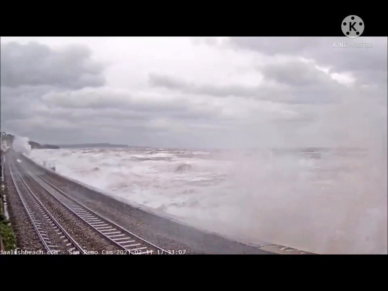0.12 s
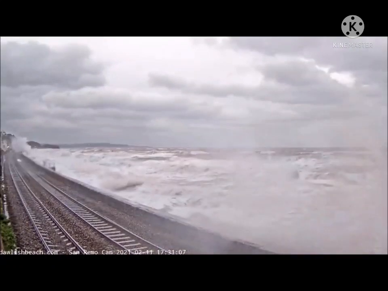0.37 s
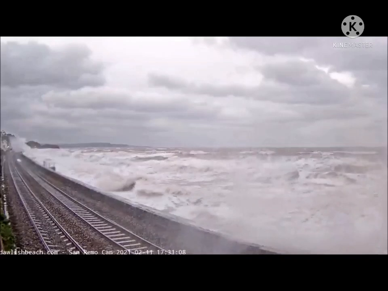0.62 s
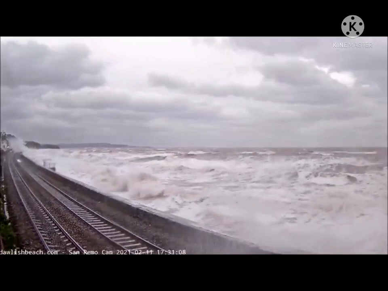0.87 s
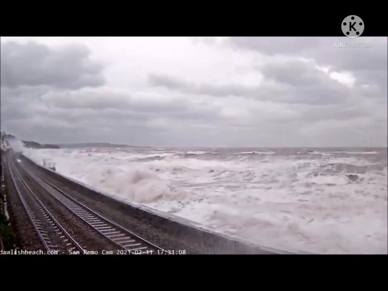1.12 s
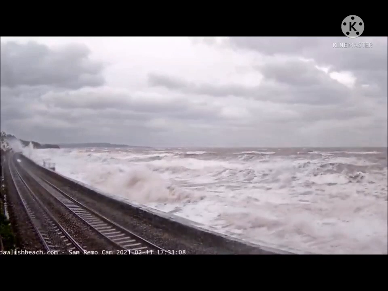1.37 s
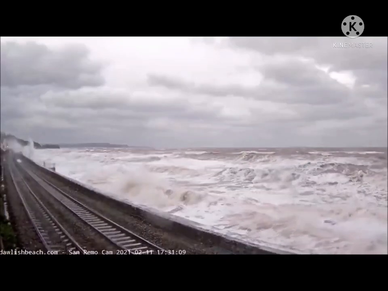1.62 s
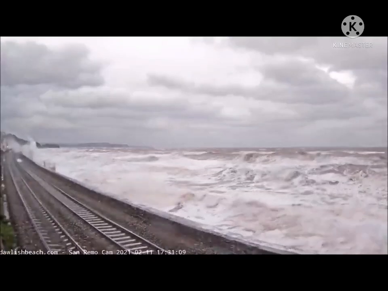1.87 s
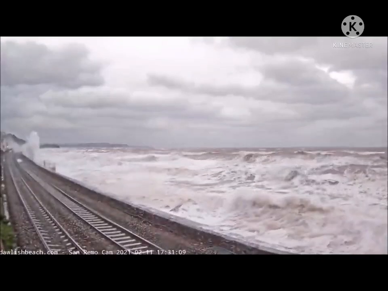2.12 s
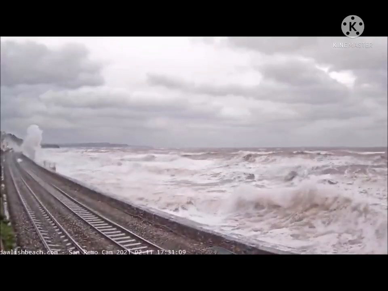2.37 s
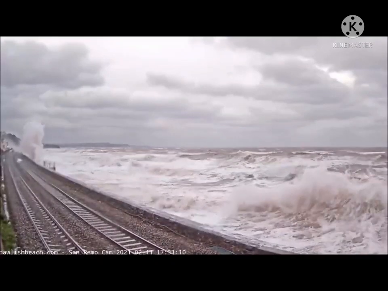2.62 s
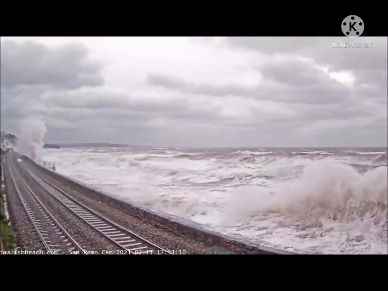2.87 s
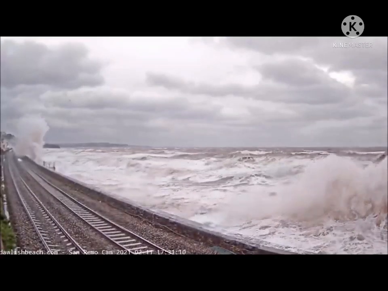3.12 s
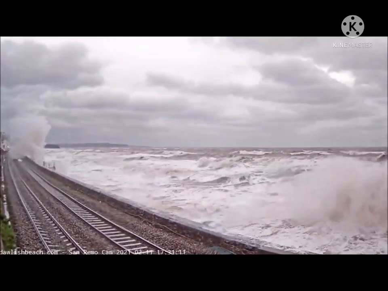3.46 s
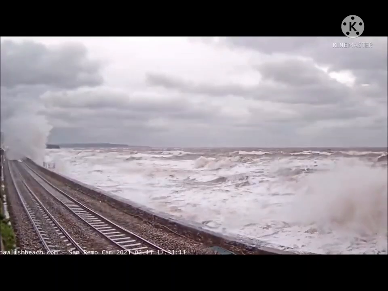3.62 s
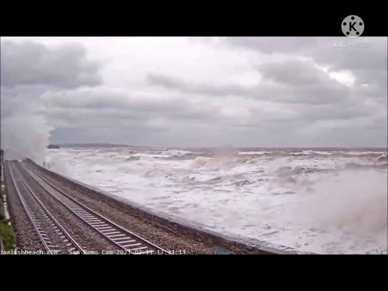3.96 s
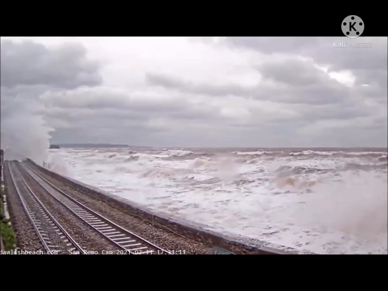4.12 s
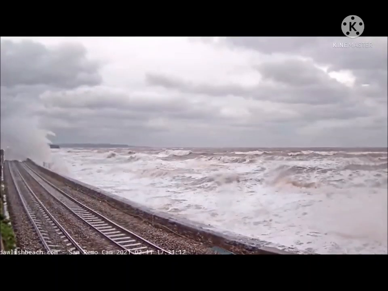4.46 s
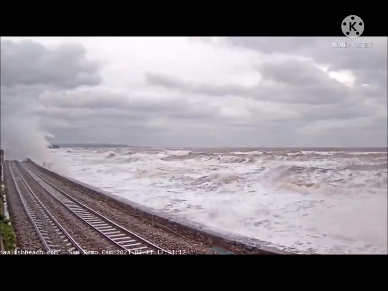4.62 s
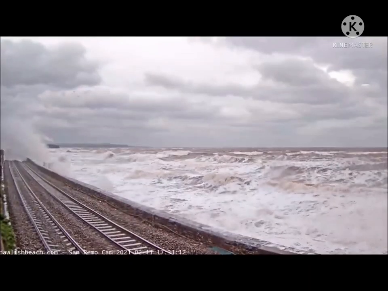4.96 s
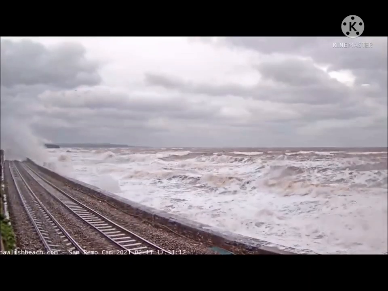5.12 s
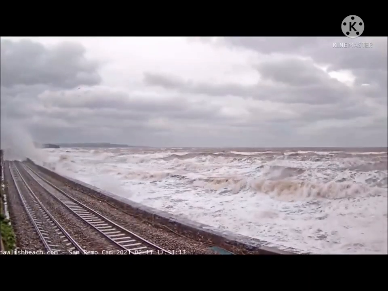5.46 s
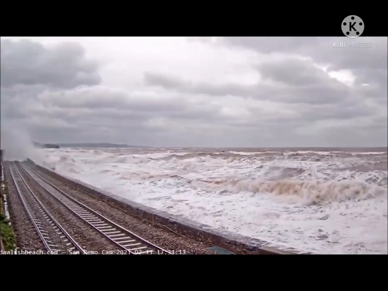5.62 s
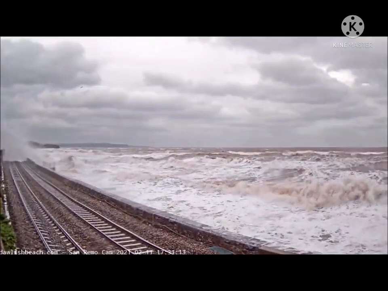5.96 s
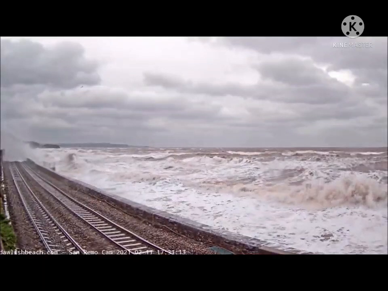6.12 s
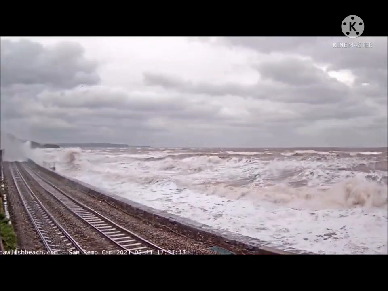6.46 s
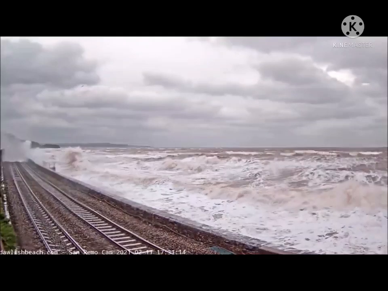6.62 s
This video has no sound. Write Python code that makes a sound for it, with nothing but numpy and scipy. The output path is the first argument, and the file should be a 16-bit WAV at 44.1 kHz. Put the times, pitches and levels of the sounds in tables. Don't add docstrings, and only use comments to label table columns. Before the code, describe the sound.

Rough surf bursts on a seaside wall with low roar, foamy wash and bright spray, under rumbling wind on a thin, glitchy mono microphone.

```python
import sys
import numpy as np
from scipy import signal
from scipy.fft import rfft, irfft, next_fast_len
from scipy.io import wavfile
from scipy.ndimage import uniform_filter1d

SR = 44100
rng = np.random.default_rng(int(sys.argv[2]) if len(sys.argv) > 2 else 0)


def persist_wave(psi):
    counts = np.round(np.clip(psi, -1, 1) * 32767).astype(np.int16)
    wavfile.write(sys.argv[1], SR, np.atleast_2d(counts).T)


def gain_from_decibels(decibels):
    exponent = np.asarray(decibels, float) / 20
    return 10 ** exponent


N = 299828

# frequency in Hz, level in dB per Hz.
HEAVE_SPECTRUM = [(.5, -12), (2, 0), (8, -1), (14, -4), (20, -30), (60, -140)]
# frequency in Hz, level in dB per Hz.
BUFFET_SPECTRUM = [(8.2, -37), (14, -7), (29, -1), (120, -20), (160, -53), (260, -120)]
# peak in seconds, level in dB.
PUSHES = [
    (.57, -28),
    (1.05, -35),
    (1.53, -29),
    (1.78, -34),
    (3.26, -38),
    (3.86, -37),
    (4.41, -29),
    (5.07, -25),
    (5.79, -37),
    (6.27, -37),
]
# peak in seconds, level in dB.
GUSTS = [(.15, -37.5), (.45, -35.5), (.58, -36.5), (1.06, -38), (1.17, -34), (1.3, -34.5), (1.4, -32),
         (1.9, -33.5), (2.2, -33), (2.421, -38), (3.0, -34.5), (3.351, -30), (3.7, -35.5), (3.961, -35.5),
         (4.11, -35.5), (4.55, -36), (4.8, -37), (5.04, -33.5), (5.259, -31.5), (5.5, -36), (5.75, -36.5),
         (6.0, -34.5), (6.28, -33), (6.49, -33)]
# frequency in Hz, level in dB per Hz.
ROAR_SPECTRUM = [(47, -20.5), (80, -4.5), (102, -6.5), (211, -5.5), (260, -5.5), (410, 0.5), (523, -7),
                 (815, -11.5), (938, -20.5), (1120, -23), (1260, -34.5), (1300, -37.5), (1690, -59.5),
                 (2860, -120)]
# frequency in Hz, level in dB per Hz.
FOAM_SPECTRUM = [(850, -38), (1450, -1), (2030, 0.5), (2330, 0.5), (2720, -8.5), (2950, -6.5), (3250, -4.5),
                 (4200, -1.5), (6290, -3), (9050, -15.5), (10500, -50.5), (14000, -54), (15200, -52)]
# frequency in Hz, level in dB per Hz.
SPRAY_SPECTRUM = [(1940, -58), (3300, -16.5), (3820, -9), (4460, -9.5), (5100, -0.5), (5540, -6),
                  (7160, 1.5), (7940, -7), (8850, -4), (10300, -10), (10500, -12.5), (12000, -18),
                  (14400, -27), (15200, -27)]
# peak in seconds, level in dB.
BOOMS = [
    (0.0, -35),
    (1.211, -38.5),
    (1.9, -39.5),
    (2.55, -41),
    (4.26, -37),
    (6.53, -33.5),
    (6.62, -36.5),
    (6.75, -36.5),
]
# crest in seconds, build-up in seconds, hold in seconds,
# foam level in dB, spray level in dB.
WAVES = [
    (-.2, .5, .3, -57, -59),
    (0.637, .75, 0.85, -52, -39),
    (0.977, 0.57, .25, -57, -42.5),
    (4.153, 1.3, 0.77, -53.5, -49),
    (6.593, .6, 0.11, -48, -47.5),
]
# centre in Hz, width in Hz, gain in dB.
HOUSING_RESPONSE = [(1258, 83, -5.5), (1407, 80, -8), (1518, 70, 3), (2720, 180, 2.5), (2902, 160, 6),
                    (3317, 150, -8.5), (5153, 400, 1), (5916, 180, -0.5), (6200, 80, -1.5),
                    (7030, 510, 0.5), (7800, 340, -1), (9540, 190, -3.5), (10310, 400, -6.5),
                    (12050, 200, -.5), (15200, 420, -10)]
# frame number, lines left above the roar, lowest line in Hz.
STARVED_FIRST = [(12, 9, 1535), (16, 3, 6973), (26, 8, 5145), (47, 11, 5379), (49, 12, 4676),
                 (54, 11, 3926), (55, 4, 4957), (77, 8, 1559), (78, 16, 1723), (87, 0, 0), (95, 11, 1559),
                 (99, 4, 2355), (148, 3, 1723), (180, 8, 1535), (193, 7, 3059), (200, 11, 4043),
                 (201, 18, 1559), (214, 9, 3574), (224, 5, 4676), (228, 10, 2238), (233, 4, 1113),
                 (236, 4, 1090), (255, 5, 1770), (271, 4, 2191), (273, 10, 1066), (291, 7, 2941),
                 (296, 9, 2098), (299, 8, 1934), (301, 5, 2191)]
# frame number, lines left above the roar, lowest line in Hz.
STARVED_SECOND = [(0, 7, 1090), (32, 18, 4066), (81, 8, 1840), (94, 6, 1770), (159, 8, 1863),
                  (184, 4, 3105), (187, 5, 1559), (198, 8, 2566), (217, 3, 4676), (225, 12, 1066),
                  (297, 7, 1113), (298, 5, 1559), (304, 6, 1535), (313, 6, 1512)]
# frequency in Hz, step in dB re line height.
STARVED_STEP = [(1000, 1.5), (5000, 0.5), (7200, 1), (9000, -4), (9600, -5.5), (10000, 4)]
# frequency in Hz, level in dB re its share.
LEAK = [(1000, -8), (4000, -7), (6000, -1), (10000, 4)]
# frequency in Hz, step in dB.
GRAIN = [(5000, 0), (8000, 2), (12000, 4)]
# frequency in Hz, step in dB.
FINEST_STEP = [(9000, -82), (12000, -72), (13500, -69), (14900, -68), (15100, -58), (15500, -54)]
# frequency in Hz, level in dB per Hz.
WIDE_SPECTRUM = [(4500, -60), (4620, -5), (5700, -5), (5800, -60), (6800, -60), (6900, 0), (7600, -1),
                 (8250, -9), (8350, -60)]

FOAM_REST_DB, SPRAY_REST_DB, ROAR_REST_DB = -57, -61, -36.5
WAVE_BUILD_DB = 13.5
LINK_SR, FRAME, ROAR_LINES = 48000, 1024, 44


def at_hz(points, hz):
    log_hz = np.log(np.array(points)[:, 0])
    return np.interp(np.log(hz + 0.0012), log_hz, np.array(points)[:, 1])


def shaped(x, db_at):
    size = next_fast_len(N)
    gain = gain_from_decibels(db_at(np.fft.rfftfreq(size, 1 / SR)))
    return irfft(rfft(x, size) * gain, size)[:N]


def noise(spectrum):
    x = shaped(rng.standard_normal(N), lambda hz: at_hz(spectrum, hz))
    return x / x.std()


def drift(rate_hz):
    return noise([(rate_hz, 0), (rate_hz * 30, -60)])


def evened(spectrum, over_s):
    eddies, span = noise(spectrum), int(over_s * SR)
    swell = uniform_filter1d(uniform_filter1d(eddies ** 2, span), span)
    return eddies / np.sqrt(swell + .15)


def swells(rest_db, s, db, rise_db_per_s, hold_s, fall_db_per_s):
    hop = 64
    t = np.arange(0, N + hop, hop)[:, None] / SR - s
    climb_db = rise_db_per_s * np.maximum(-t, 0)
    fall_db = fall_db_per_s * np.maximum(t - hold_s, 0)
    power = gain_from_decibels(2 * (db - climb_db - fall_db)).sum(axis=1)
    power = np.interp(np.arange(N) / hop, np.arange(len(t)), power)
    return 10 * np.log10(gain_from_decibels(2 * rest_db) + power)


def slam():
    start_s, peak_db, hz, t60_s, crest_t60_s = 1.916, -15, 21.5, 0.8, .35
    t = np.maximum(np.arange(N) / SR - start_s, 0)
    swing = -np.sin(2 * np.pi * hz * t) * gain_from_decibels(-60 * t / t60_s)
    overtones = np.sin(6 * np.pi * hz * t) - np.cos(4 * np.pi * hz * t)
    crest = overtones * gain_from_decibels(-60 * t / crest_t60_s)
    onset = 1 - np.exp(-t / .02)
    return gain_from_decibels(peak_db) * onset * (swing + .6 * crest)


def wind():
    gust_db = swells(-40.5, *np.transpose(GUSTS), rise_db_per_s=109, hold_s=0, fall_db_per_s=110.5)
    lumps = gain_from_decibels(gust_db + 1.17 * drift(8.0)) * evened(BUFFET_SPECTRUM, over_s=.05)
    push_db = swells(-48, *np.transpose(PUSHES), rise_db_per_s=60, hold_s=0, fall_db_per_s=40)
    heave = gain_from_decibels(push_db + 1.5) * evened(HEAVE_SPECTRUM, over_s=.15)
    return lumps + heave - heave.mean() + slam()


def roar():
    s, build_s, hold_s, crest_db, _ = np.transpose(WAVES)
    foam_db = swells(FOAM_REST_DB, s, crest_db, WAVE_BUILD_DB / build_s, hold_s, 13.5)
    boom_db = swells(ROAR_REST_DB, *np.transpose(BOOMS), rise_db_per_s=200, hold_s=0, fall_db_per_s=72)
    follow_db = .2 * (foam_db - FOAM_REST_DB)
    surge_db = 0.29 * drift(3.1)
    return gain_from_decibels(boom_db + follow_db + surge_db) * noise(ROAR_SPECTRUM)


def foam():
    s, build_s, hold_s, crest_db, _ = np.transpose(WAVES)
    rise = WAVE_BUILD_DB / build_s
    foam_db = swells(FOAM_REST_DB, s, crest_db, rise, hold_s, fall_db_per_s=13.5)
    foam_db = swells(foam_db, s, crest_db - 8, rise, hold_s, fall_db_per_s=2.5)
    return gain_from_decibels(foam_db + 4.0 + 0.66 * drift(10)) * noise(FOAM_SPECTRUM)


def spray():
    s, build_s, hold_s, _, crest_db = np.transpose(WAVES)
    rise = WAVE_BUILD_DB / build_s
    spray_db = swells(SPRAY_REST_DB, s, crest_db, rise, hold_s, fall_db_per_s=30.5)
    spray_db = swells(spray_db, s, crest_db - 16.5, rise, hold_s, fall_db_per_s=5)
    flicker_db, hiss = .8 * drift(8.0), noise(SPRAY_SPECTRUM)
    highpass = signal.butter(2, 9520, "high", fs=SR, output="sos")
    fine = signal.sosfilt(highpass, hiss)
    reach_db = swells(SPRAY_REST_DB, s, crest_db, rise, hold_s, fall_db_per_s=6)
    dull = gain_from_decibels(.25 * (reach_db - crest_db.max()) + 1.5)
    return gain_from_decibels(spray_db + flicker_db) * (hiss + (dull - 1) * fine)


def sea():
    return roar() + foam() + spray()


def housing(hz):
    total_db = 0
    for centre_hz, width_hz, db in HOUSING_RESPONSE:
        total_db = total_db + db * np.exp(-.5 * ((hz - centre_hz) / (width_hz / 2)) ** 2)
    return total_db


def scene():
    return np.tile(shaped(sea(), housing) + wind(), (2, 1))


def starve(lines, hz, count, lowest_hz, leak_db):
    is_roar = np.arange(FRAME) < ROAR_LINES
    hiss = np.sqrt(np.mean((lines * ~is_roar) ** 2))
    lone_line_db = 22 - 1.2 * np.log2(count + 1)
    step = np.where(is_roar, gain_from_decibels(-17.5), hiss * gain_from_decibels(lone_line_db + at_hz(STARVED_STEP, hz)))
    height = np.abs(lines) / step
    kept = np.floor(height + .5) * is_roar
    if count:
        lowest, top = np.searchsorted(hz, [lowest_hz + 1, 9400]) - 1
        tallest = np.argsort(-height[lowest + 1:top])[:count - 1]
        kept[lowest] = 1
        kept[lowest + 1 + tallest] = 1
    leak = gain_from_decibels(leak_db + at_hz(LEAK, hz)) * lines
    return np.where(kept > 0, np.sign(lines) * kept * step, leak)


def thin_link(x, grid, starved, sharp, step_db, leak_db, lone_db):
    n, k = np.arange(2 * FRAME) + .5, np.arange(FRAME) + .5
    basis = np.cos(np.pi / FRAME * (n + FRAME / 2) * k[:, None]) * np.sqrt(2 / FRAME)
    hz = k * LINK_SR / (2 * FRAME)
    blocks = np.pad(x, (2 * FRAME - grid, 3 * FRAME))
    blocks = blocks[:len(blocks) // FRAME * FRAME].reshape(-1, FRAME)

    turn = np.tile(k / FRAME, (len(blocks), 1))
    turn[np.array(sharp) + 2] = np.clip(.5 + 8 * (k / FRAME - .5), 0, 1)
    window = np.hstack([np.sin(np.pi / 2 * turn[:-1]), np.cos(np.pi / 2 * turn[1:])])
    lines = (window * np.hstack([blocks[:-1], blocks[1:]])) @ basis.T

    bands = np.sqrt(np.mean(lines.reshape(len(lines), -1, 16) ** 2, axis=2))
    roar_finer_db = -10 * (k < ROAR_LINES)
    local = gain_from_decibels(step_db + at_hz(GRAIN, hz) + roar_finer_db) * np.repeat(bands, 16, axis=1)
    ragged_db = 6 * uniform_filter1d(rng.standard_normal(bands.shape), size=3, axis=0)
    step = np.maximum(local, gain_from_decibels(at_hz(FINEST_STEP, hz) + np.repeat(ragged_db, 16, axis=1)))
    rounded = np.sign(lines) * np.floor(np.abs(lines) / step + .41) * step

    for frame, count, lowest_hz in starved:
        lone = not any(abs(row[0] - frame) == 1 for row in starved)
        lone = lone / 2 if frame in sharp else lone
        rounded[frame + 1] = starve(lines[frame + 1], hz, count, lowest_hz, leak_db + lone * lone_db)

    halves, out = window * (rounded @ basis), np.zeros_like(blocks)
    out[:-1] += halves[:, :FRAME]
    out[1:] += halves[:, FRAME:]
    return out.ravel()[2 * FRAME - grid:][:len(x)]


def wide_frame():
    centre_s, length_s, level_db = 0.628, .046, -43
    phase = np.clip((np.arange(N) / SR - centre_s) / length_s, -.5, .5)
    return gain_from_decibels(level_db) * np.cos(np.pi * phase) ** 2 * noise(WIDE_SPECTRUM)


def band_limit(x):
    return signal.sosfilt(signal.butter(12, 15400, fs=SR, output="sos"), x)


def record(dry):
    fast = signal.resample_poly(dry[0], 160, 147)
    fast = thin_link(fast, 1015, STARVED_FIRST, sharp=[26, 76, 99, 235],
                     step_db=-4.0, leak_db=-22.5, lone_db=4.5)
    fast = thin_link(fast, 884, STARVED_SECOND, sharp=[94, 184],
                     step_db=-4.5, leak_db=-34, lone_db=12)
    mono = signal.resample_poly(fast, 147, 160)[:N] - .00055
    mix = mono + wide_frame() * [[1], [-1]]
    return band_limit(mix)


dry = scene()
out = record(dry)
persist_wave(out)
```